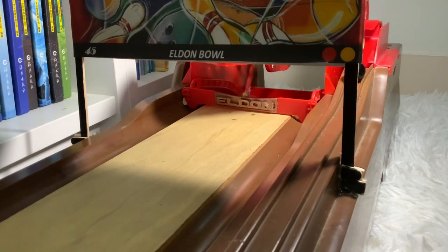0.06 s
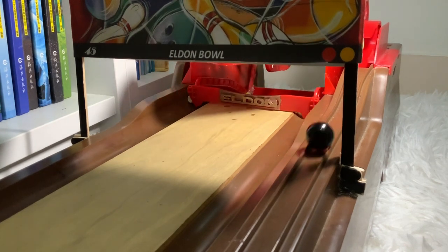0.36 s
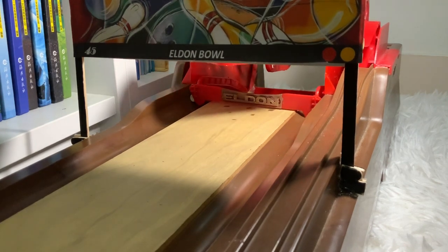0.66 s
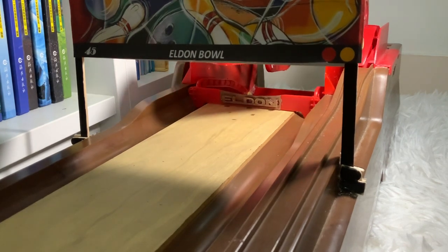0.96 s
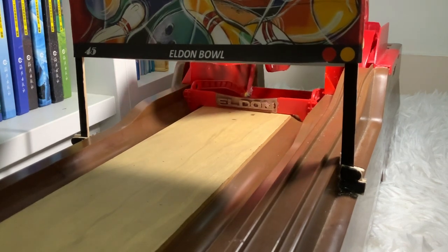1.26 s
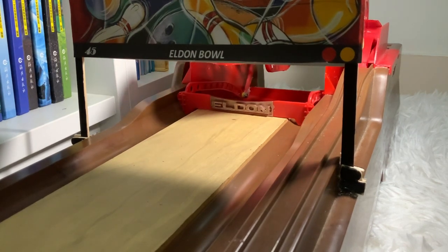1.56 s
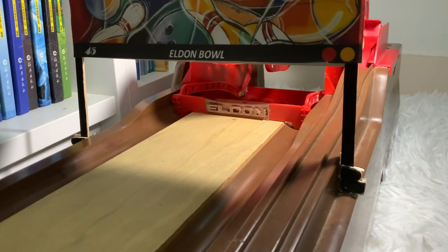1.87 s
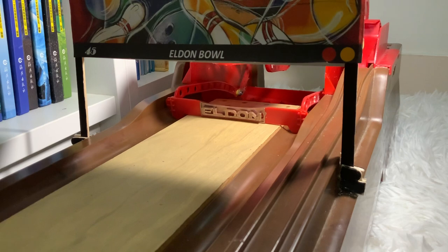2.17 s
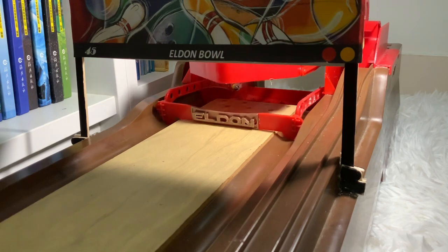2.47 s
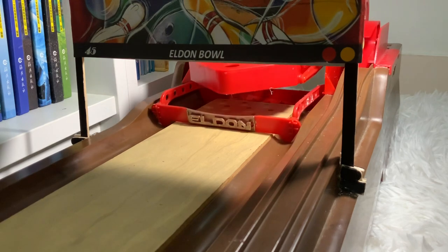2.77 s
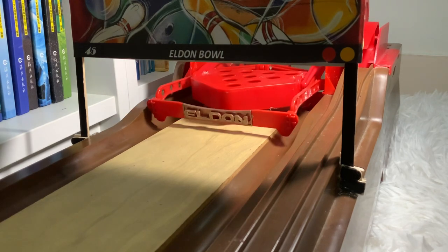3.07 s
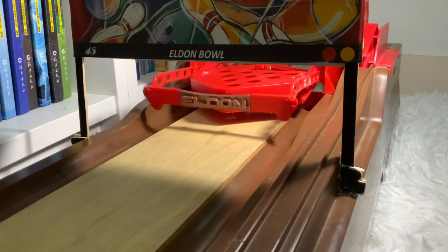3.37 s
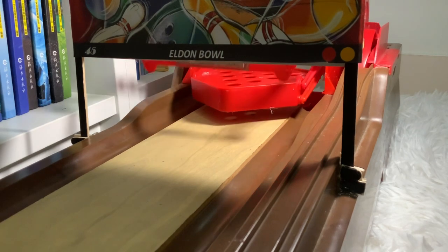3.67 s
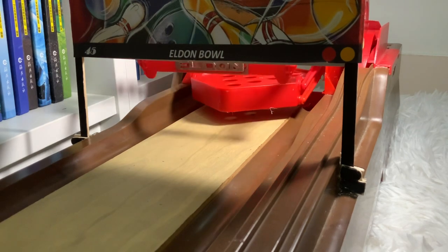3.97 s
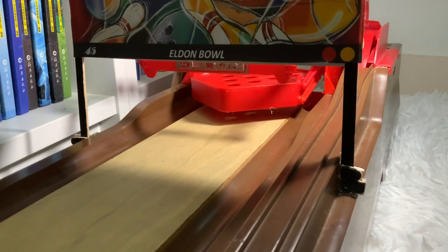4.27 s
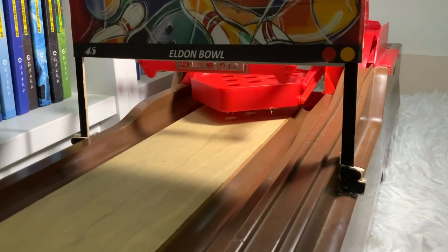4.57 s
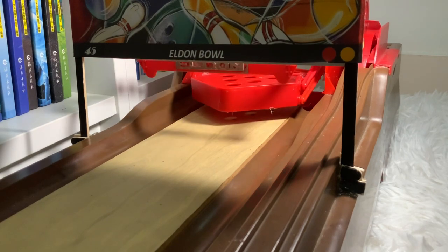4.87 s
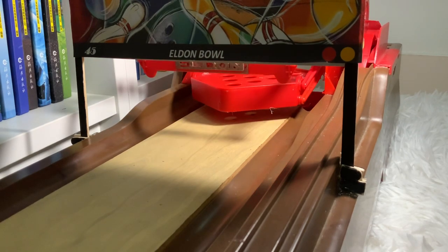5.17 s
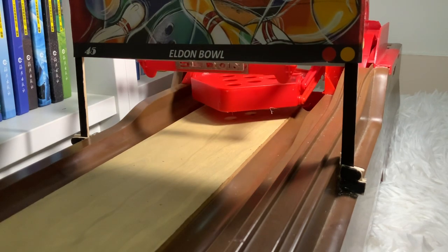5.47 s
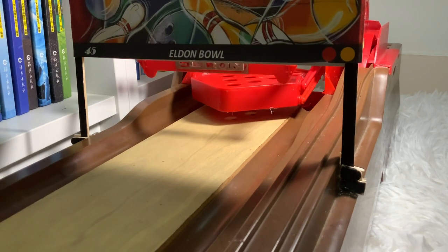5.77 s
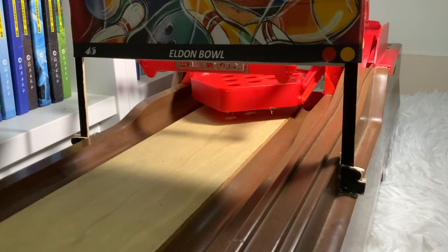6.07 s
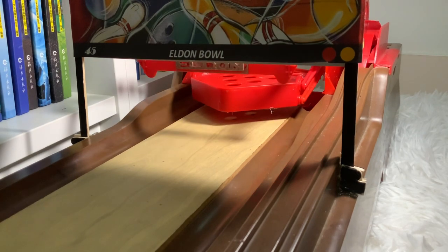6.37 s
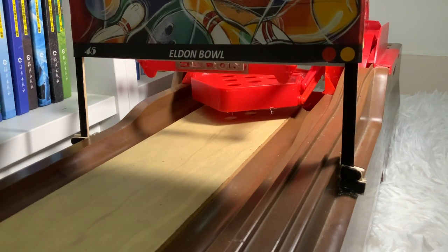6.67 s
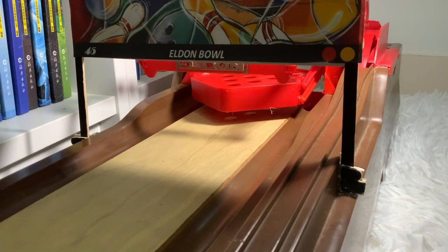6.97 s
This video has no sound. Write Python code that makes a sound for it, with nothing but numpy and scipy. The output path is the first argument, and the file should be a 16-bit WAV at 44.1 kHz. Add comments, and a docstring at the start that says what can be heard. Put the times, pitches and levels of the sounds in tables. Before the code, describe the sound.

A hard ball clatters and rolls along a toy bowling alley's hollow plastic track while the resetting mechanism clacks, rattles and latches.

```python
"""A hard ball clatters into the plastic return track of a toy bowling alley and rolls along it, shaking
loose parts into a rattle. As the toy resets, the sweep bar chatters and the pin deck clacks, slides and
latches. The ball slows, rests, rolls back and knocks. Rolling, knocks and rattles all ring the same
hollow lane, heard close up in a small room with a low drone."""
import sys
import numpy as np
from scipy import signal
from scipy.fft import rfft, irfft, next_fast_len
from scipy.io import wavfile
from scipy.ndimage import map_coordinates

SR = 44100
rng = np.random.default_rng(int(sys.argv[2]) if len(sys.argv) > 2 else 0)


def wav_record(signal):
    """Record a signal, one row per channel, as 16-bit PCM in the file named by sys.argv[1]."""
    frames = np.transpose(np.atleast_2d(signal))
    bounded = np.clip(frames, -1, 1)
    # unit amplitude maps onto the largest positive 16-bit level
    quanta = np.round(bounded * 32767).astype(np.int16)
    wavfile.write(sys.argv[1], SR, quanta)


N = 317961
BODY_HZ = np.fft.rfftfreq(8192, 1 / SR)  # the frequency grid of every body's colour
TOP_HZ = 16100


def amp(db):
    """Decibels to gain."""
    return 10 ** (np.asarray(db) / 20)


def unit(x):
    """Scale to rms 1."""
    return x / np.sqrt(np.mean(x ** 2) + 1e-20)


def unit_hit(x):
    """Scale a hit to the energy of 10 ms at rms 1."""
    return x / np.sqrt(np.sum(x ** 2) / (SR / 100))


def curve(points, hz=BODY_HZ):
    """Read (freq_hz, value) points on a log frequency axis."""
    freqs, values = np.transpose(points)
    return np.interp(np.log(hz + 1), np.log(freqs + 1), values)


def wobble(knots_per_s):
    """A smooth random drift."""
    knots = rng.standard_normal(int(N * knots_per_s / SR) + 4)
    return map_coordinates(knots, [np.arange(N) * knots_per_s / SR])


def filtered(x, response):
    """Filter x by a complex function of frequency."""
    n = x.shape[-1]
    size = 2 * next_fast_len(n // 2 + 1024)
    return irfft(rfft(x, size) * response(np.fft.rfftfreq(size, 1 / SR)), size)[..., :n]


def ring(x, colour_db):
    """Ring a body of this colour with x; minimum phase, so nothing sounds before the blow."""
    cepstrum = irfft(np.log(amp(colour_db) + 1e-6))
    half = len(cepstrum) // 2
    cepstrum[1:half] *= 2
    cepstrum[half + 1:] = 0
    return signal.oaconvolve(x, irfft(np.exp(rfft(cepstrum))))[:len(x)]


def add(track, start_s, sound):
    """Mix a sound into the track."""
    part = track[max(round(start_s * SR), 0):][:len(sound)]
    part += sound[:len(part)]


def burst(t60_s, crack_db):
    """A sharp crack, then the dense, fast-dying ring of thin plastic."""
    t = np.arange(SR // 6) / SR
    decay = amp(-60 * t / t60_s) + amp(crack_db - 60 * t / .018)
    return (1 - np.exp(-t / .0007)) * decay * rng.standard_normal(len(t))


def bumps(per_s, spread_db):
    """Tiny contacts of uneven size at random moments."""
    chance, size, push = rng.random(N), rng.standard_normal(N), rng.standard_normal(N)
    return (chance < per_s / SR) * amp(spread_db * np.clip(size, -2, 2)) * np.sign(push)


def grains(per_s, spread_db, decay_s):
    """An envelope of random ticks, each jumping up and dying away."""
    return signal.lfilter([1.], [1, -np.exp(-1 / (decay_s * SR))], np.abs(bumps(per_s, spread_db)))


# The hollow lane's peaks and dips: centre_hz, width_hz, gain_db
LANE_MODES = [(276, 32, 5.5), (351, 26, 5.5), (415, 36, -3.5), (443, 16, 4.5), (486, 17, 6.5),
              (582.6, 130, -6.5), (652.4, 38, 7.5), (694.4, 20, 6), (757, 40, -6.5), (774, 24, 3),
              (820, 37, 5.5), (882.2, 39, 8), (966.6, 50, 7), (1074, 69, 3), (1297, 45, 6.5), (1477, 27, 6),
              (1742, 27, 4), (2070, 70, -3.5), (2183, 56, 6), (2410, 47, 2.5), (3460, 76, 5.5),
              (3746, 140, 2.5), (4110, 91, 4.5), (5300, 65, 4.5), (5740, 69, 3.5), (6100, 60, 0.5)]
def lane_db():
    """The lane's voice: narrow resonances with a few gaps between them."""
    return sum(db / (1 + (2 * (BODY_HZ - centre) / width) ** 2) for centre, width, db in LANE_MODES)


# The ball's runs; levels are relative, the last four taken as it starts to slow:
# start_s, at_speed_s, slows_s, stop_s, whirr_at_speed_db, whirr_db, rumble_db, grit_db, rasp_db
ROLLS = [(-0.1, 0.0, 0.24, 1.5, -26.5, -27.5, -37, -41, -52),
         (0.02, 0.4, 0.92, 1.04, -27, -25, -33, -41.5, -50),
         (0.94, 1.04, 1.887, 2.4, -30.5, -33.5, -39.5, -53.5, -55),
         (2.09, 2.411, 3.44, 4.58, -32, -34.3, -37.5, -56, -56),
         (4.65, 5.8, 6.26, 6.41, -38.5, -36.5, -40.5, -65.5, -59),
         (6.99, 7.012, 7.04, 7.26, -62, -70, -51, -105, -95)]
def roll_levels_db():
    """Rumble, whirr, grit and rasp follow the ball's speed as it rises, holds and runs out."""
    speed_power = 3.01  # the whirr's amplitude grows with this power of the speed
    t, levels = np.arange(N) / SR, np.full((4, N), -np.inf)
    for start, at_speed, slows, stop, at_speed_db, whirr_db, rumble_db, grit_db, rasp_db in ROLLS:
        moving = (t > start) & (t < stop)
        speed = np.interp(t[moving], [start, at_speed, slows, stop], [0, 1, 1, 0])
        coast_db = np.interp(t[moving], [at_speed, slows], [at_speed_db - whirr_db, 0])
        change_db = coast_db + speed_power * 20 * np.log10(speed)
        # grit and rasp fade fastest, the rumble lingers
        roll = [rumble_db + .66 * change_db, whirr_db + change_db,
                grit_db + 1.5 * change_db, rasp_db + 1.35 * change_db]
        levels[:, moving] = np.maximum(levels[:, moving], roll)
    return levels


# The low body of the roll: freq_hz, gain_db
RUMBLE_COLOUR = [(40, -57.5), (120, -12), (185, -30), (220, -17.5), (265, -4.5), (400, 0.5), (520, -4),
                 (700, -12), (1200, -58.5), (3000, -71.5)]
# Its midrange whirr: freq_hz, gain_db
WHIRR_COLOUR = [(40, -61.5), (150, -41), (350, -29), (520, -6), (650, 3), (900, -2.5), (1150, 2.5),
                (1550, -15), (2000, -29.5), (2500, -22.5), (4000, -53), (9000, -72.5)]
# The brighter ring of a fast ball: freq_hz, gain_db
FAST_COLOUR = [(600, -14.5), (770, -13.5), (840, 4), (950, -6.5), (1450, 3), (1800, -3), (2300, -17),
               (3200, -35.5), (6000, -47)]
# Dust under the ball: freq_hz, gain_db
GRIT_COLOUR = [(100, -44.5), (1000, -13), (1800, 3), (2400, 6.5), (3000, -1), (3700, -0.5), (4900, -5.5),
               (8000, -10.5), (9500, -19.5), (12000, -20.5), (15500, -31)]
# The scrape of the thin rails: freq_hz, gain_db
RASP_COLOUR = [(1800, -18.5), (2300, -0.5), (2800, 1), (3300, -5.5), (3900, -1), (4400, -10.5), (5100, -17),
               (8000, -24.5), (12000, -44)]
def rolling_ball():
    """Bumps, dust and rails drum on the lane and ring it; the pressure wavers as the ball turns."""
    def through_lane(x, colour):
        return unit(ring(x, curve(colour) + lane_db()))

    rumble_db, whirr_db, grit_db, rasp_db = roll_levels_db()
    pressure = amp(1.2 * wobble(34))
    fine_bumps = bumps(per_s=2600, spread_db=2.5)
    jolts = amp(11) * bumps(per_s=20, spread_db=2)
    rumble = amp(rumble_db - 2) * through_lane(fine_bumps + jolts, RUMBLE_COLOUR)
    whirr = amp(whirr_db - 1.5) * through_lane(fine_bumps + jolts, WHIRR_COLOUR)
    # a faster ball makes shorter contacts, so the upper ring grows quicker than the rest
    fast_db = whirr_db - 3 + .8 * (whirr_db + 26)
    fast_ring = amp(fast_db) * through_lane(bumps(per_s=2600, spread_db=2.5), FAST_COLOUR)
    flutter = amp(1.2 * wobble(260) + 1.7 * wobble(40))
    specks = grains(per_s=28, spread_db=3, decay_s=.003)
    dust = (flutter + 1.6 * specks) * rng.standard_normal(N)
    grit = amp(grit_db + 2.5) * through_lane(dust, GRIT_COLOUR)
    scrape = (.24 + grains(per_s=130, spread_db=2, decay_s=.002)) * rng.standard_normal(N)
    rasp = amp(rasp_db) * through_lane(scrape, RASP_COLOUR)
    return pressure * (rumble + whirr + fast_ring + grit + rasp)


def passing_modes(roll, spacing_hz=32, swell_s=.22, depth_db=2.7):
    """The ball passes nodes and crests of the lane's modes, so each swells and fades in turn."""
    hz, t, spectrum = signal.stft(roll, SR, nperseg=4096)
    knots = rng.standard_normal((int(hz[-1] / spacing_hz) + 2, int(t[-1] / swell_s) + 2))
    swell = map_coordinates(knots, np.meshgrid(hz / spacing_hz, t / swell_s, indexing="ij"))
    return signal.istft(spectrum * unit(amp(depth_db * swell)), SR, nperseg=4096)[1][:N]


# The hollow knock of the lane, also in clacks and hops: freq_hz, gain_db
KNOCK_COLOUR = [(30, -54), (90, -28), (200, -9.5), (300, -3), (550, 4), (700, -2.5), (1100, -3),
                (1600, -7.5), (2200, -12.5), (3500, -10), (7000, -35.5), (14000, -61.5)]
# The bright click of plastic, also in clacks and the latch: freq_hz, gain_db
CLICK_COLOUR = [(60, -50), (300, -5.5), (1500, -3.5), (2500, 0.5), (3700, -2.5), (4800, 0), (6200, 0),
                (8000, 3), (9600, -6.5), (11000, -8.5), (13000, -10.5), (15500, -19.5)]
# Loose parts shaken by hard blows: start_s, hold_s, ticks_db, hollow_db, brightness_db_per_octave
RATTLES = [(0.0, 0.01, -33.5, -41.5, 4), (0.074, 0.089, -29, -47, -0.5), (0.235, 0.013, -31, -33, -1.5),
           (1.013, 0.018, -43, -39, -5), (1.053, 0.053, -32, -31, -6), (1.917, 0.014, -37.5, -52, 12),
           (2.098, 0.11, -55, -71, -6), (2.344, 0.019, -43.5, -44, -3.5), (3.443, 0.059, -46, -55.5, 15)]
def rattles(rise_s=.0059, fall_db_per_s=173):
    """Shaken parts tick densely at random against the lane, then settle."""
    track, t = np.zeros(N), np.arange(SR) / SR
    octaves = np.log2(np.maximum(BODY_HZ, 1000) / 1000)
    chatter = grains(per_s=1000, spread_db=3, decay_s=.002)
    for start_s, hold_s, ticks_db, hollow_db, brightness in RATTLES:
        ticks = np.roll(chatter, -round(start_s * SR))[:SR] * rng.standard_normal(SR)
        shake = np.minimum(t / rise_s, 1) * amp(-fall_db_per_s * np.maximum(t - hold_s, 0))
        plastic = unit(ring(ticks, curve(CLICK_COLOUR) + lane_db() + brightness * octaves))
        hollow = unit(ring(ticks, curve(KNOCK_COLOUR) + lane_db()))
        add(track, start_s, shake * (amp(ticks_db) * plastic + amp(hollow_db) * hollow))
    return track


def struck_lane_db(centre_hz):
    """The colour of a knock: the struck spot favours the resonances near one frequency."""
    spot_db = -4 * np.minimum(np.log2((BODY_HZ + 1) / centre_hz) ** 2, 2)
    return curve(KNOCK_COLOUR) + lane_db() + spot_db


def lane_knock(centre_hz, boom_db, softness_db, belly_hz=567):
    """A part hits the lane and rebounds once; a softer contact builds more slowly and sounds duller."""
    belly_db = boom_db / (1 + (BODY_HZ / belly_hz) ** 12)
    treble_octaves = np.log2(np.maximum(BODY_HZ / 1800, 1))
    dull_db = -.67 * max(softness_db - 24.5, 0) * treble_octaves
    force = burst(t60_s=.09, crack_db=3)
    rebound_s = .013 * (1 + .37 * rng.uniform(-.88, 1))
    add(force, rebound_s, amp(-13.5) * burst(t60_s=.15, crack_db=3))
    rise_s = np.clip(softness_db / 16000, .0003, .003)
    force *= 1 - np.exp(-np.arange(len(force)) / SR / rise_s)
    return unit_hit(ring(force, struck_lane_db(centre_hz) + belly_db + dull_db))


def plastic_click():
    """A loose part with a colour of its own grazes, lands, then chatters twice."""
    part_colour = np.column_stack([np.geomspace(1500, TOP_HZ, 48), 3 * rng.standard_normal(48)])
    touches = [(0, -19), (.003, 0), (rng.uniform(.009, .016), -13), (rng.uniform(.018, .034), -19)]
    force = np.zeros(SR // 5)
    for delay_s, level_db in touches:
        add(force, delay_s, amp(level_db) * burst(t60_s=.085, crack_db=13))
    return unit_hit(ring(force, curve(CLICK_COLOUR) + lane_db() + curve(part_colour)))


# Ball and plastic parts colliding, plus a soft lead-in just before the latch snaps; levels are relative:
# start_s, knock_db, click_db, centre_hz, boom_db
CLACKS = [(0.036, -11, -19, 694, -3), (0.074, -8, -15.5, 880, -3), (0.085, -21.5, -23, 850, -8),
          (0.107, -2.5, -14.5, 840, -3), (0.114, -17.5, -20, 660, -10.5), (0.136, -13, -15.5, 830, -2),
          (0.146, -16.5, -22.5, 790, 3), (0.157, -4, -24, 595, -2), (0.236, -18, -23, 790, -1.5),
          (0.346, -16, -27, 840, -1.5), (0.445, -8, -20, 845, -0.5), (0.75, -31, -36.5, 900, 0.5),
          (0.857, -29.5, -39, 900, -0.5), (0.873, -30, -30.5, 819, -2.5), (0.92, -24, -34.5, 890, -3.5),
          (0.941, -3, -12, 1440, -1), (1.006, -16, -39, 900, 3), (1.015, -15, -17.5, 1142, -2.5),
          (1.043, -14, -20, 800, -3), (1.051, -8.5, -12.5, 905, 1), (1.084, -20, -22.5, 882, -6),
          (1.109, -12.5, -26, 854, 1), (1.138, -29.5, -33.5, 900, -0.5), (1.179, -33.5, -28, 900, 1.5),
          (1.254, -22, -35.5, 670, -3), (1.76, -18, -55, 800, -5.5), (1.921, -11.5, -33, 800, -3),
          (1.959, -8, -32, 780, -7.5), (1.977, -30, -48, 750, -17.5), (2.036, -15, -47, 1040, -1),
          (2.065, -13.5, -45, 950, 0), (2.132, -33.5, -58, 900, -12), (2.156, -20.5, -58, 690, -4),
          (2.25, -26.5, -70, 520, 8), (2.282, -33, -44.5, 632, -6), (2.371, -16, -32, 915, -1.5),
          (2.404, -18.5, -37.5, 385, -6), (2.589, -19, -51, 1200, -13), (3.144, -10.5, -37.5, 720, -4),
          (3.167, -20, -60, 330, 17), (3.21, -19, -37.5, 820, 1), (3.386, -20.5, -28.5, 456, -1.5),
          (3.439, -21, -24.5, 970, 2), (3.497, -37, -44, 900, -5.5), (3.533, -40.5, -51, 900, -1),
          (3.599, -44.5, -58.5, 900, -2), (3.636, -42.5, -43, 1180, -1.5), (3.755, -23, -52, 1100, 4.5),
          (3.771, -16.5, -27.5, 1200, 4.5), (3.972, -24.5, -79.5, 950, 9.5), (3.982, -40.5, -87, 399, 17),
          (4.239, -48, -78, 630, -3), (4.334, -43.5, -93, 1300, -1), (5.188, -59, -74, 900, 0),
          (5.314, -36, -86, 1100, 16), (5.322, -23.5, -64.5, 1200, 3.5), (5.333, -28, -79, 381, 9),
          (5.574, -33, -63.5, 674, 11), (5.667, -26, -73, 718, 0.5), (5.794, -47, -71, 912, 1),
          (5.843, -26, -66, 904, -9), (5.862, -30, -72, 904, -3), (6.0, -41, -67, 900, -4),
          (6.04, -20.5, -61.5, 793, -3), (6.14, -42, -69, 897, 5), (6.227, -27.5, -71, 900, 13),
          (6.252, -35.5, -69, 936, 2), (6.27, -25, -58, 910, 3), (6.325, -43, -73, 897, 4),
          (6.998, -31.5, -51, 602, 9.5), (7.172, -26.5, -59, 936, -5.5), (7.178, -12, -42, 1010, -9)]
def clacks():
    """Each clack layers a hollow knock and a plastic click; one with little click sounds soft."""
    track = np.zeros(N)
    for start_s, knock_db, click_db, centre_hz, boom_db in CLACKS:
        knock = lane_knock(centre_hz, boom_db, softness_db=knock_db - click_db)
        add(track, start_s, amp(knock_db - 9.5) * knock)
        add(track, start_s - .003, amp(click_db - 1.5) * plastic_click())  # the graze comes early
    return track


# The ball's small landings: start_s, relative_db, centre_hz
HOPS = [(0.511, -17, 1000), (0.557, -25, 900), (0.584, -14.5, 880), (0.612, -8, 880), (0.668, -13, 1443),
        (0.69, -16.5, 1000), (2.509, -23.5, 900), (2.628, -20, 900), (2.664, -23, 900), (2.738, -33.5, 900)]
def ball_hops():
    """The ball jumps at flaws in the track and lands with a short, dry knock."""
    track = np.zeros(N)
    for start_s, relative_db, centre_hz in HOPS:
        knock = ring(burst(t60_s=.028, crack_db=4.5), struck_lane_db(centre_hz))
        add(track, start_s, amp(relative_db - 12) * unit_hit(knock))
    return track


# The sweep bar's ping: pitch_hz, relative_db, t60_s
BAR_MODES = [(2180, -5, 0.045), (3520, -5.5, 0.023)]
# Its taps: start_s, relative_db
BAR_TAPS = [(1.92, -27), (1.931, -33), (1.958, -29), (1.976, -28), (2.131, -34)]
def sweep_bar():
    """The thin bar chatters on its stop, each tap ringing a short, high ping."""
    track, t = np.zeros(N), np.arange(SR // 8) / SR
    ping = sum(amp(db - 60 * t / t60_s) * np.sin(2 * np.pi * hz * t) for hz, db, t60_s in BAR_MODES)
    attack = 1 - np.exp(-t / .00035)
    for start_s, relative_db in BAR_TAPS:
        add(track, start_s, amp(relative_db) * attack * ping)
    return track


# Heavy parts settling on the base: start_s, pitch_hz, relative_db, t60_s
THUDS = [(2.374, 392, -31.5, 0.042), (2.391, 357, -19, 0.038), (3.39, 452, -12, 0.027),
         (3.409, 315, -25.5, 0.057), (3.47, 109, -32, 0.066)]
def base_thuds():
    """A soft, heavy contact moves only one low mode of the base."""
    track, t = np.zeros(N), np.arange(SR // 4) / SR
    attack = 1 - np.exp(-t / .00196)
    for start_s, pitch_hz, relative_db, t60_s in THUDS:
        decay = amp(relative_db + 5 - 60 * t / t60_s)
        add(track, start_s, attack * decay * np.sin(2 * np.pi * pitch_hz * t))
    return track


# The hollow ring of the sliding pin deck: freq_hz, gain_db
DECK_COLOUR = [(700, -52.5), (1000, -4), (1100, -8), (1250, 3.5), (1400, -14.5), (1530, -0.5), (1750, -17),
               (3000, -45.5)]
# Its slide to rest: start_s, length_s, level_db
DECK_SLIDES = [(3.535, 0.255, -46.5)]
def deck_slide():
    """The pin deck drags on its guide, plastic on plastic, swelling and easing off."""
    t, stroke = np.arange(N) / SR, np.zeros(N)
    for start_s, length_s, level_db in DECK_SLIDES:
        position = 2 * (t - start_s) / length_s - 1
        stroke += amp(level_db) * np.sqrt(np.clip(1 - position ** 2, 0, 1))
    friction = bumps(per_s=2500, spread_db=4)
    return stroke * unit(ring(friction, curve(DECK_COLOUR)))


# The bright resonances of the catch: centre_hz, width_hz, gain_db
CATCH_MODES = [(4100, 530, -1), (4950, 480, 1), (5840, 330, -3.5), (6250, 150, -4.5), (8005, 400, 2.5),
               (11290, 730, -5), (12600, 700, -10), (14100, 400, -13.5), (15030, 426, -17.5)]
# Its snap: start_s, relative_db
LATCH_SNAPS = [(3.7695, -9.5)]
def deck_latch():
    """The pin deck snaps into its stiff catch with a bright, short ring."""
    track = np.zeros(N)
    peaks = sum(amp(db) / (1 + ((BODY_HZ - hz) / width) ** 2) ** 2 for hz, width, db in CATCH_MODES)
    colour_db = 20 * np.log10(peaks + amp(curve(CLICK_COLOUR) - 12.5))
    for start_s, relative_db in LATCH_SNAPS:
        snap = ring(burst(t60_s=.13, crack_db=13), colour_db)
        add(track, start_s, amp(relative_db - 3) * unit_hit(snap))
    return track


def panel_echoes(x):
    """Short echoes off the toy's panels, whose paths keep changing as ball and parts move."""
    track, hop = np.zeros(N), SR // 8
    fade = signal.windows.cosine(2 * hop)
    padded = np.pad(x, (0, 2 * hop))
    for start in range(0, N, hop):
        piece = padded[start:][:2 * hop] * fade
        paths = burst(t60_s=.043, crack_db=-6.5)
        add(track, start / SR, signal.fftconvolve(piece, paths / np.linalg.norm(paths)))
    return track


# The small room's decay: freq_hz, t60_s
ROOM_DECAY = [(150, 0.35), (1000, 0.14), (4500, 0.37), (8000, 0.3), (14000, 0.19)]
def room_tail(x):
    """A short stereo tail, every frequency dying at its own speed."""
    hz, t, noise = signal.stft(rng.standard_normal((2, SR // 2)), SR, nperseg=256)
    decay = amp(-60 * t / curve(ROOM_DECAY, hz)[:, None])
    tail = signal.istft(noise * decay, SR, nperseg=256)[1]
    return signal.fftconvolve(x[None], tail / np.linalg.norm(tail[0]), axes=1)[:, :N]


# Width, the part of the power that arrives as panel echoes: freq_hz, share
ECHO_SHARE = [(100, .14), (400, .13), (800, .14), (2200, .2), (4000, .13), (7000, .06), (10000, .02),
              (12000, .09), (15000, .04)]
# Balance: freq_hz, left_over_right_db
BALANCE = [(110, -2), (200, 2), (380, 2.5), (500, 6), (870, 7), (1290, 3.5), (2380, 2), (4400, .5),
           (8000, 0)]
# Phase between the sides: freq_hz, left_lead_rad
LEFT_LEAD = [(50, 0), (400, .5), (620, 1.5), (850, 1.1), (1050, .4), (1400, .4), (1750, -.4), (2400, -3.1),
             (3100, -5.4), (3800, -6.3), (6500, -7.3), (9000, -9.3), (11000, -9.6), (13300, -12.5)]
def stereo_image(toy):
    """Two microphone ports hear toy, panels and room, each with its own level and phase."""
    sides = np.array([[1], [-1]])

    def placement(hz):
        return amp(sides * curve(BALANCE, hz) / 2) * np.exp(1j * sides * curve(LEFT_LEAD, hz) / 2)

    direct = filtered(toy, lambda hz: np.sqrt(1 - curve(ECHO_SHARE, hz)))
    echoes = filtered(panel_echoes(toy), lambda hz: np.sqrt(curve(ECHO_SHARE, hz)))
    return filtered(direct + sides * echoes + amp(-22) * room_tail(toy), placement)


# The bed of room tone under everything: freq_hz, gain_db
DRONE_COLOUR = [(20, -29), (38, -20), (50, -1.5), (62, -2), (76, 8.5), (100, -4.5), (135, -3), (170, -21),
                (260, -20.5), (450, -40), (1000, -40.5), (3000, -50), (15000, -65.5)]
def room_drone(hum_hz=70):
    """The room's low noise and wavering hum, nearly alike on both sides."""
    mid, side = filtered(rng.standard_normal((2, N)), lambda hz: amp(curve(DRONE_COLOUR, hz)))
    noise = amp(-55.5) * unit(mid + np.array([[.22], [-.22]]) * side)
    hum_gain = amp(-63 + 2.2 * wobble(23))
    hum = hum_gain * np.sin(2 * np.pi * hum_hz * np.arange(N) / SR + .19 * wobble(4.5))
    return (noise + hum) * amp([[-1.1], [1.1]])


def scene():
    """The ball and the resetting toy, placed in stereo over the room's drone."""
    ball = passing_modes(rolling_ball()) + ball_hops()
    parts = clacks() + base_thuds() + sweep_bar() + deck_slide() + deck_latch() + rattles()
    return stereo_image(ball + parts) + room_drone()


def record(dry):
    """Round off the highest peaks and cut everything above TOP_HZ."""
    rounded = dry / (1 + np.abs(dry / .92) ** 6) ** (1 / 6)
    return filtered(rounded, lambda hz: 1 / (1 + (hz / TOP_HZ) ** 120))


dry = scene()
out = record(dry)
wav_record(out)
```